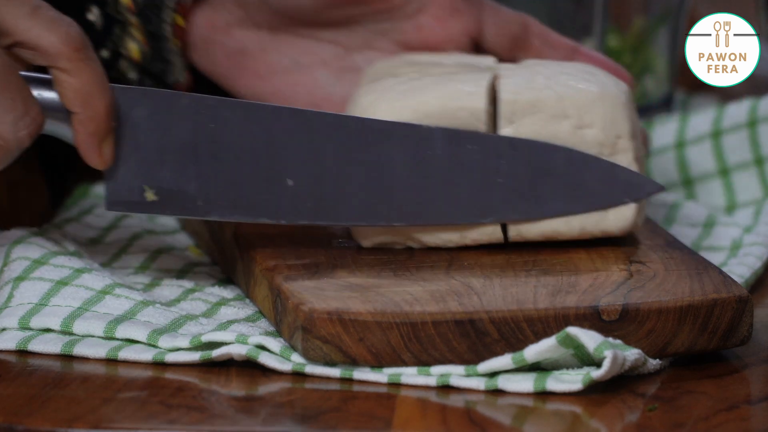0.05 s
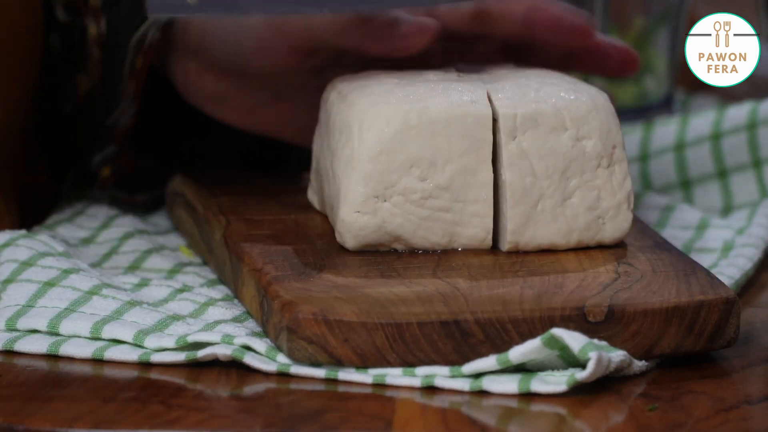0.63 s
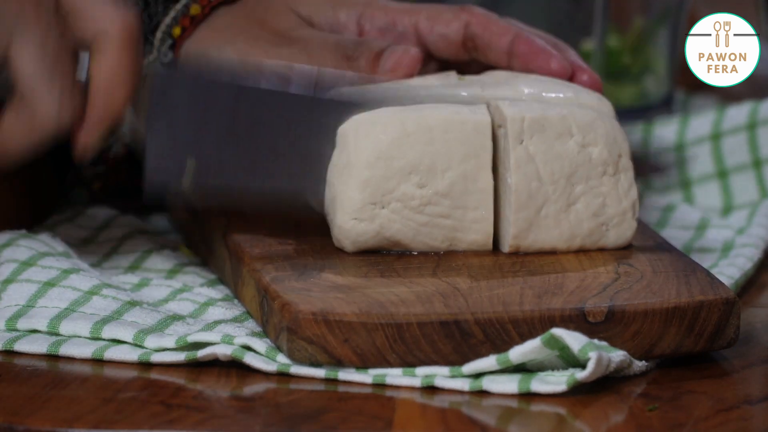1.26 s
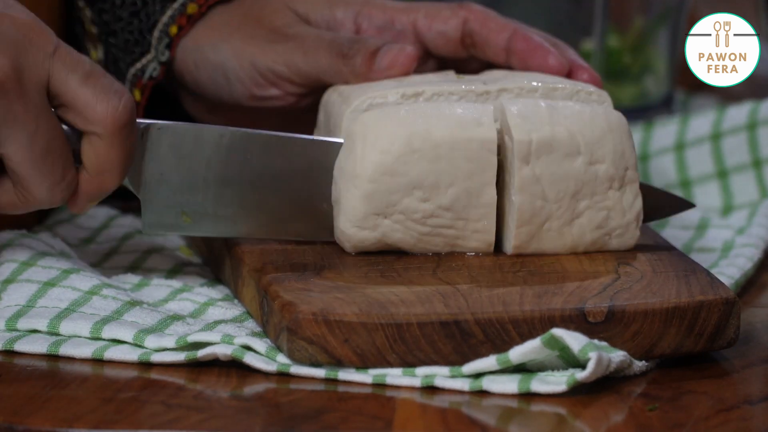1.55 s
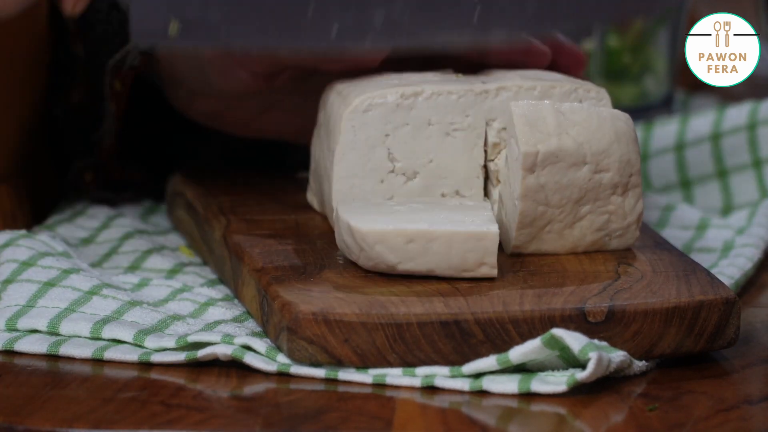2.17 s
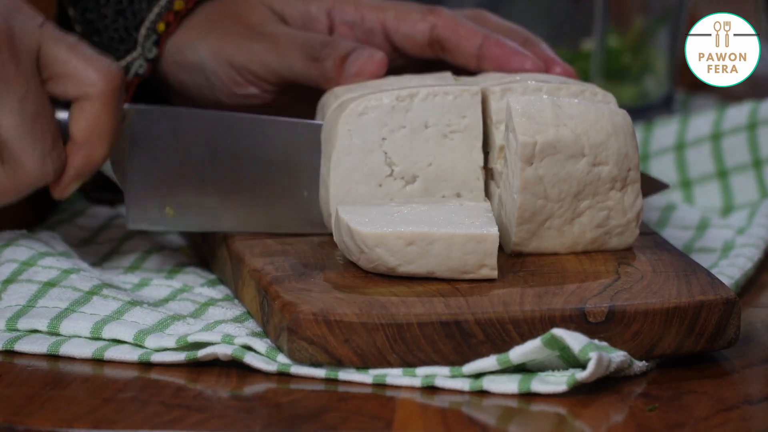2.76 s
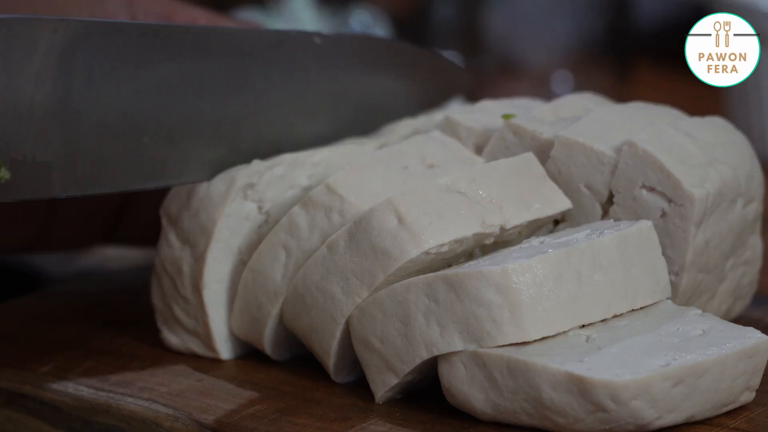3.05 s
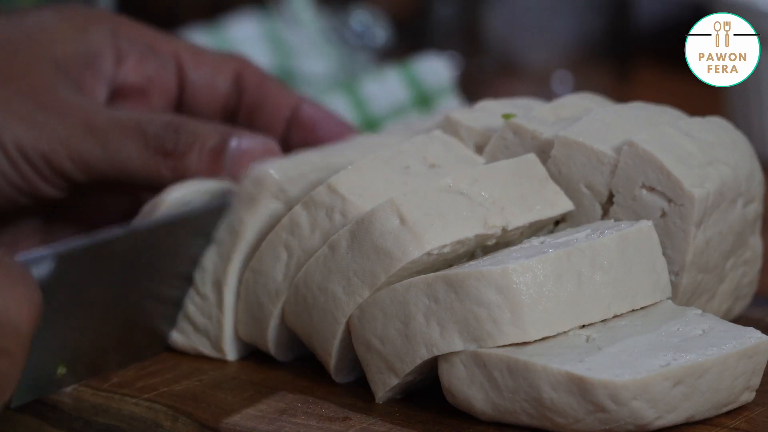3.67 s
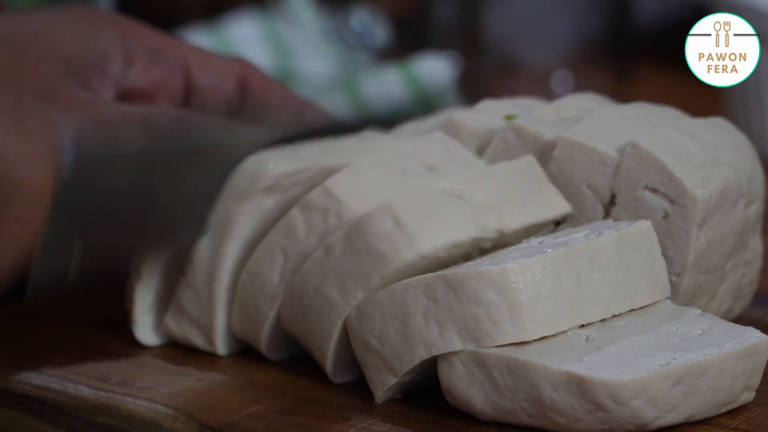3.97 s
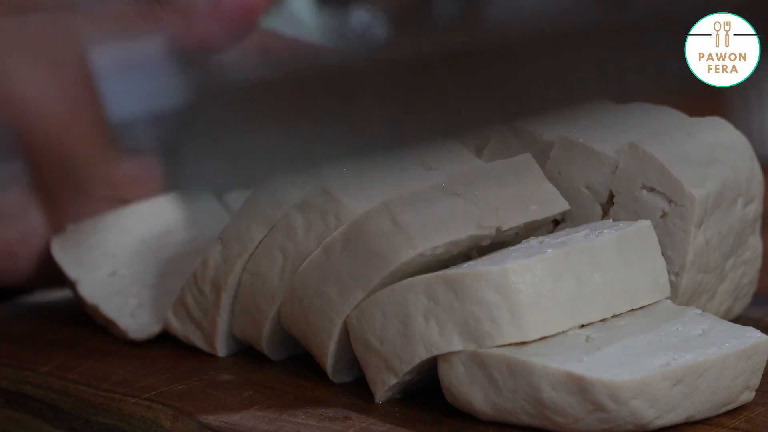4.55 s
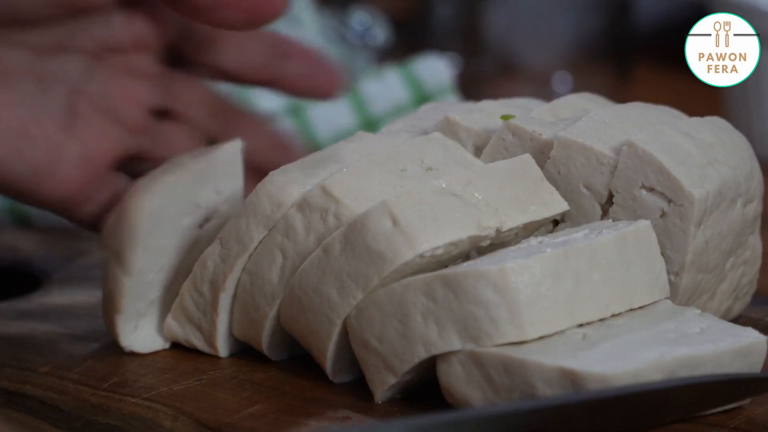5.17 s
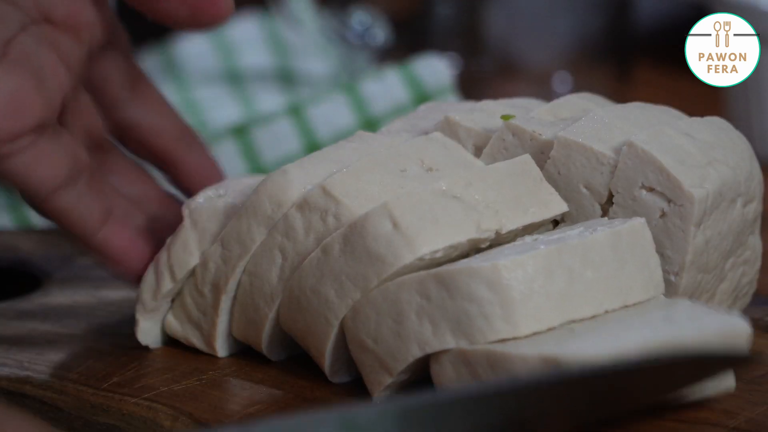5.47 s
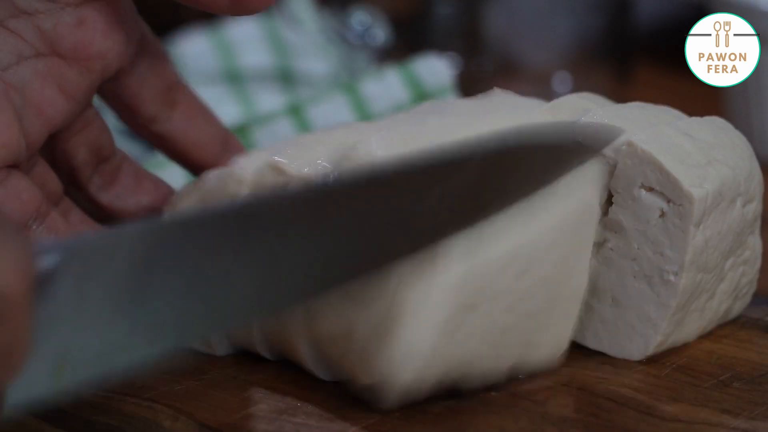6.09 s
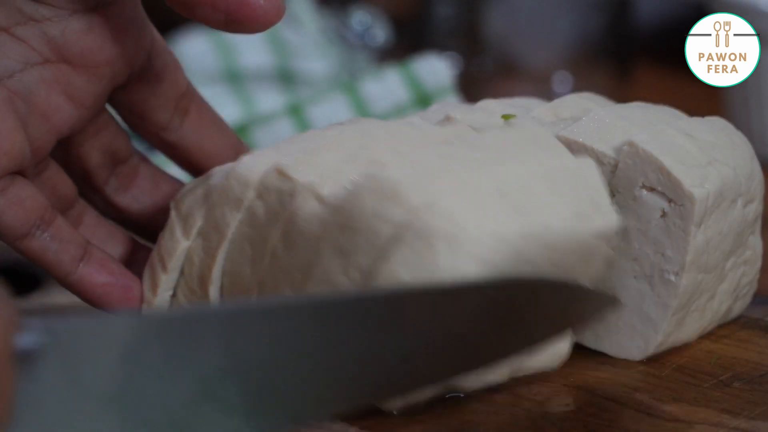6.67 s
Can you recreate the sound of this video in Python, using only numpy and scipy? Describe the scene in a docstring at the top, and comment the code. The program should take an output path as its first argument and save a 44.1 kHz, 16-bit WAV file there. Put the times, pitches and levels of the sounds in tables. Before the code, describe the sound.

A chef's knife cuts through soft tofu and knocks on a thick wooden board, once softly, then twice sharply. Wet cut faces tick faintly as they part, and a slice slithers quietly. The blade lands lightly with a brief metallic scrape, then knocks twice more, the last with a clear steel ring. The board is straight ahead of the microphone in a small, hard-walled kitchen with steady low air hiss.

```python
"""A chef's knife slices tofu in a small, hard-walled kitchen, over steady air hiss. Wet cut faces tick
faintly as they part. At 1.3, 2.7 and 3.5 s the edge knocks on a thick wooden board and the room answers.
A slice slithers at 4.2-4.6 s. At 5 s the edge lands lightly and drags, setting the blade singing.
Two more knocks follow at 5.7 and 6.5 s, the last with a clear ring of steel."""
import sys
import numpy as np
from scipy import signal
from scipy.fft import rfft, irfft, next_fast_len
from scipy.io import wavfile

SR = 44100
rng = np.random.default_rng(int(sys.argv[2]) if len(sys.argv) > 2 else 0)


def persist_wave(psi):
    """Save psi, clipped to +-1, as 16-bit WAV."""
    counts = np.round(np.clip(psi, -1, 1) * 32767).astype(np.int16)
    wavfile.write(sys.argv[1], SR, np.atleast_2d(counts).T)


N = 305613
TIME_S = np.arange(N) / SR
RING_S = TIME_S[:SR // 2]


def amp(db):
    """Decibels to gain."""
    return 10 ** (np.asarray(db) / 20)


def unit_rms(x):
    """Scale to rms 1."""
    return x / np.sqrt(np.mean(x ** 2) + 1e-20)


def curve(points, hz):
    """Interpolate (Hz, value) points on a log frequency axis."""
    points_hz, values = np.transpose(points)
    return np.interp(np.log(hz + 1), np.log(points_hz + 1), values)


def swell(start_s, end_s, attack_s, release_s):
    """Envelope: exponential rise to start_s, hold to end_s, exponential fall."""
    return np.exp(-np.maximum(start_s - TIME_S, 0) / attack_s - np.maximum(TIME_S - end_s, 0) / release_s)


def add(track, start_s, x):
    """Mix x into track from start_s."""
    part = track[..., round(start_s * SR):][..., :x.shape[-1]]
    part += x[..., :part.shape[-1]]


def filtered(x, response):
    """Apply response(Hz) by FFT."""
    size = x.shape[-1]
    padded = next_fast_len(size + SR // 4)
    return irfft(rfft(x, padded) * response(np.fft.rfftfreq(padded, 1 / SR)), padded)[..., :size]


def resonance(f, hz, width_hz):
    """Damped resonance, peak gain 1."""
    return 1j * f * width_hz / (hz * hz - f * f + 1j * f * width_hz)


def impulse(magnitude):
    """Minimum-phase pulse with this spectrum."""
    cepstrum = irfft(np.log(np.maximum(magnitude, 1e-6)))
    half = len(cepstrum) // 2
    cepstrum[1:half] *= 2
    cepstrum[half + 1:] = 0
    return irfft(np.exp(rfft(cepstrum)))


def grains(size, spiky_db):
    """Noise of tiny slips, very uneven in size."""
    return unit_rms(rng.standard_normal(size) * amp(spiky_db * rng.standard_normal(size)))


def diffuse(coherence, size):
    """Stereo noise from all sides, with the given left-right coherence by frequency."""
    def mid_side_gains(f):
        angle = np.arccos(np.clip(curve(coherence, f), -1, 1)) / 2
        return np.array([np.cos(angle), np.sin(angle)])
    mid, side = filtered(rng.standard_normal((2, size)), mid_side_gains)
    return np.array([mid + side, mid - side])


def room_noise(hiss_db=-63.5, hum_db=-106, mains_hz=50):
    """Steady air noise with a trace of mains hum."""
    # Each row: frequency in Hz, relative density in dB.
    spectrum = [(25, -45), (63, -39), (100, -26), (160, -17.5), (250, -14), (400, -9), (700, -5.5),
                (1250, -1), (1600, -3.5), (2500, -4.5), (4300, -7), (6000, -11.5), (10000, -16.5),
                (15800, -22)]
    # Each row: frequency in Hz, left-right coherence.
    coherence = [(60, 0.97), (150, 0.91), (400, 0.61), (1000, 0.52), (2400, 0.47), (6000, 0.32),
                 (15000, 0.14)]
    air = unit_rms(filtered(diffuse(coherence, N), lambda f: amp(curve(spectrum, f))))
    hum = np.sin(2 * np.pi * mains_hz * TIME_S)
    return amp(hiss_db) * air + amp(hum_db) * hum


def kitchen(x, room_db, gap_s=0.0007, build_s=0.02, linger_db=-37, linger_t60_s=2.07):
    """Direct sound, then wall echoes that build up, die by band and linger faintly."""
    # Each row: frequency in Hz, left-right coherence.
    coherence = [(150, 0.93), (1000, 0.93), (2400, 0.84), (6000, 0.65), (15000, 0.2)]
    # Each row: frequency in Hz, T60 in seconds.
    reverb_times = [(200, 0.38), (600, 0.53), (1300, 0.38), (3000, 0.39), (6000, 0.45), (14000, 0.26)]
    hz, t, bands = signal.stft(diffuse(coherence, SR), SR, nperseg=256)
    decay = amp(-60 * t / curve(reverb_times, hz)[:, None]) + amp(linger_db - 60 * t / linger_t60_s)
    tail = signal.istft(bands * decay, SR, nperseg=256)[1][:, :SR]
    build_up = np.sqrt(1 - np.exp(-np.maximum(TIME_S[:SR] - gap_s, 0) / build_s))
    response = amp(room_db) * unit_rms(tail * build_up) / np.sqrt(SR)
    response[:, 0] += 1  # direct path
    return signal.fftconvolve(x[None], response, axes=1)


def tofu():
    """A slice slithers over the fingers; films of water snap as cut faces part."""
    # Each row: frequency in Hz, relative level in dB.
    slide_spectrum = [(800, -17), (2000, 5), (3800, 12), (6000, 4), (9000, -11), (15000, -19)]
    # Each row: time of top speed in seconds, level in dB, rise and fall in seconds.
    slides = [(4.25, -70.5, 0.12, 0.083), (4.56, -65, 0.042, 0.061)]
    # Each row: start in seconds, level in dB, centre and width in Hz, fade in seconds.
    snaps = [(.055, -60, 1930, 700, 0.007), (1.185, -61, 3400, 1200, .0034),
             (1.466, -54.5, 4400, 1000, .005), (1.648, -60.5, 2220, 700, .02),
             (1.846, -61, 3970, 1400, 0.0077), (2.919, -65, 6500, 4200, .023),
             (3.019, -56.5, 2320, 600, 0.012), (3.747, -52, 8100, 7000, .0015)]
    slither = unit_rms(filtered(grains(N, spiky_db=9), lambda f: amp(curve(slide_spectrum, f))))
    speed = sum(amp(db) * swell(peak_s, peak_s, rise_s, fall_s) for peak_s, db, rise_s, fall_s in slides)
    out = kitchen(speed * slither, room_db=3)[:, :N]
    for start_s, db, hz, width_hz, fade_s in snaps:
        crackle = grains(len(RING_S), spiky_db=6.5)
        film = unit_rms(filtered(crackle, lambda f: resonance(f, hz, width_hz) ** 2))
        add(out, start_s, kitchen(amp(db) * film * np.exp(-RING_S / fade_s), room_db=-1.5))
    return out


def blade_ring(dragged, onset_s=0.0006):
    """Hand-damped steel modes. Dragging favours other modes than a blow, and the wood adds damping."""
    # Each row: frequency in Hz, struck T60 in seconds, struck and dragged levels in dB.
    modes = [(1841, .3, -24, -6), (2325, .26, 0, -4), (2652, .12, -8, -20), (2882, .22, 1, -16),
             (2925, .15, -5, -20), (3172, .2, -5, -7), (3355, .14, -16, -1), (3921, .21, -6, -20),
             (4215, .17, -32, 1), (4613, .13, -28, -4), (4775, .13, -12, -12), (5028, .12, -18, -12),
             (5970, .12, -15, -22), (6379, .15, -14, -12), (7263, .12, -9, -22), (7574, .08, -28, -11),
             (8393, .1, -19, -20), (8624, .08, -25, -9), (9604, .08, -16, -13), (10850, .07, -18, -15),
             (12320, .07, -26, -20), (13730, .06, -29, -21)]
    damping = 3 if dragged else 1
    ring = np.zeros(len(RING_S))
    for hz, t60_s, struck_db, dragged_db in modes:
        envelope_db = (dragged_db if dragged else struck_db) - 60 * damping * RING_S / t60_s
        ring += amp(envelope_db) * np.cos(2 * np.pi * hz * RING_S)
    return ring * (1 - np.exp(-RING_S / onset_s))


def drag(start_s=5.04, lift_off_s=5.102, peak_db=-55, growth_db_per_s=106, singing_db=-1):
    """The edge catches on the grain, pressed ever harder until lift-off: wood rasps, the blade sings."""
    # Each row: frequency in Hz, gain in dB.
    rasp_spectrum = [(40, -45), (150, -21), (600, 1.5), (3500, 6), (7000, -9), (15000, -22)]
    pressure = amp(peak_db + growth_db_per_s * np.minimum(TIME_S - lift_off_s, 0))
    stroke = pressure * swell(start_s, lift_off_s, attack_s=0.009, release_s=0.0081)
    slips = grains(N, spiky_db=5) * stroke
    ring = blade_ring(dragged=True)
    singing = signal.fftconvolve(slips, ring / np.linalg.norm(ring))[:N]
    rasp = filtered(slips, lambda f: amp(curve(rasp_spectrum, f)))
    return kitchen(amp(singing_db) * singing + rasp, room_db=4.5)[:, :N]


def board_smear(f, trip_s, feedback):
    """All-pass: a wave running to and fro in the board spreads the blow in time."""
    delay = np.exp(-2j * np.pi * f * trip_s)
    return (delay - feedback) / (1 - feedback * delay)


def board_spectrum(f):
    """Magnitude response of the board under the edge: wood modes over a dull shove."""
    # Each row: frequency and width in Hz, level in dB.
    modes = [(426, 220, -22), (573, 65, -14.5), (672, 60, -11.5), (798, 210, -13), (1122, 152, 0.5),
             (1237, 182, 3), (1578, 180, 2), (1820, 540, 1), (1984, 390, -2.5), (2580, 330, 1),
             (2822, 140, 4.5), (3196, 293, -0.5), (4240, 200, -21.5), (5100, 780, -15), (6420, 1300, -34),
             (8000, 1000, -31), (9430, 2300, -36), (13000, 4900, -48)]
    # Each row: frequency in Hz, level in dB.
    shove = [(30, -50), (120, -50.5), (300, -30.5), (1000, -29), (2500, -21), (4500, -19.5), (15000, -48)]
    power = sum((amp(db) * np.abs(resonance(f, hz, width_hz)) ** 2) ** 2 for hz, width_hz, db in modes)
    return np.sqrt(power + amp(curve(shove, f)) ** 2)


def board_blow(magnitude):
    """One smeared pulse in the wood, unit level over its first 10 ms."""
    blow = filtered(impulse(magnitude),
                    lambda f: board_smear(f, 0.0006, 0.65) * board_smear(f, 0.00145, 0.75))
    return blow / np.std(blow[:SR // 100])


def knocks(steel_db=-6, spot_width_ratio=0.061, settle_crack_db=-12):
    """The edge hits the board, then settles. Place and firmness set the colour; the blade rings on."""
    # Each row: start in seconds, level in dB, settling delay in seconds, settling gain in dB,
    # thud, hardness and crack in dB, two tones of the struck spot (each Hz, then lift in dB),
    # relative blade ring in dB, room in dB, left over right in dB.
    landings = [(1.3377, -38.5, .0074, 4, 1, -17.5, -26, 1257, 7.5, 1674, 6.7, -44, 2, .6),
                (2.6780, -26.5, 0.0084, -1, 2, -0.5, -6, 1278, 11.9, 5560, 6.4, -47, 2, -0.17),
                (3.4665, -25, 0.0033, -10, 12.5, -1, -1, 1557, 12.7, 3970, 14, -18.5, 0.4, 0.39),
                (5.0159, -52, .004, -10, 15, -6.5, -1, 1860, 2.5, 4600, 21, -7, 2.5, 1),
                (5.7183, -34, .0024, 9.5, 3, 4, 15, 1680, 7.8, 2840, 3.2, -35, 2.33, -.3),
                (6.5209, -24.5, 0.00095, -2.5, 4.5, 2.5, 4.5, 1400, 4.8, 2920, 6.5, -2.5, 2.5, -0.53)]
    out = np.zeros((2, N))
    f = np.fft.rfftfreq(len(RING_S), 1 / SR)
    wood = board_spectrum(f)
    low_cut = signal.butter(2, 1000, "high", fs=SR, output="sos")  # a thin blade radiates no bass
    steel = signal.sosfilt(low_cut, blade_ring(dragged=False))

    def lift(hz, db):
        return np.abs(1 + (amp(db) - 1) * resonance(f, hz, spot_width_ratio * hz))

    for (start_s, db, delay_s, settle_db, thud_db, hard_db, crack_db,
         low_hz, low_db, high_hz, high_db, ring_db, room_db, pan_db) in landings:
        spot = wood * lift(low_hz, low_db) * lift(high_hz, high_db)
        pan = amp([[pan_db / 2], [-pan_db / 2]])
        touch = (start_s, db, crack_db)
        settle = (start_s + delay_s, db + settle_db, crack_db + settle_crack_db)
        for at_s, level_db, top_db in (touch, settle):
            contact_hz_db = [(380, 0), (600, thud_db), (760, thud_db), (1150, 0), (1700, 0),
                             (2800, hard_db), (8000, top_db)]
            blow = board_blow(spot * amp(curve(contact_hz_db, f)))
            knock = amp(level_db) * (blow + amp(steel_db + ring_db) * steel)
            add(out, at_s, pan * kitchen(knock, room_db))
    return out


def scene():
    """Board straight ahead; room noise slightly left."""
    lean_left = amp([[0.3], [-0.3]])
    return knocks() + drag() + tofu() + lean_left * room_noise()


def record(dry):
    """Brick-wall low-pass."""
    cutoff_hz = 15750
    return filtered(dry, lambda f: f < cutoff_hz)


dry = scene()
out = record(dry)
persist_wave(out)
```